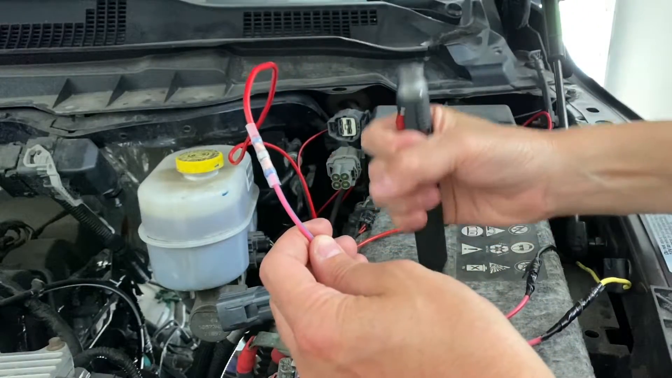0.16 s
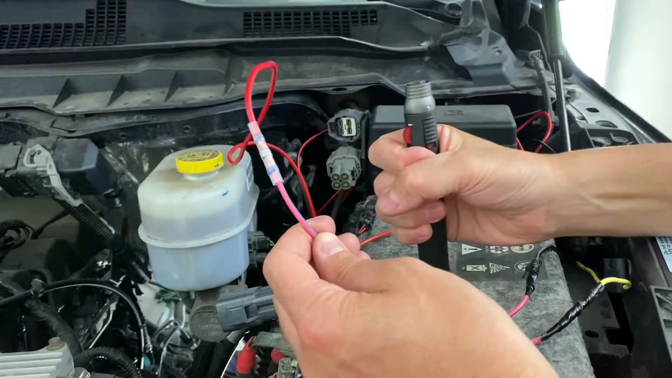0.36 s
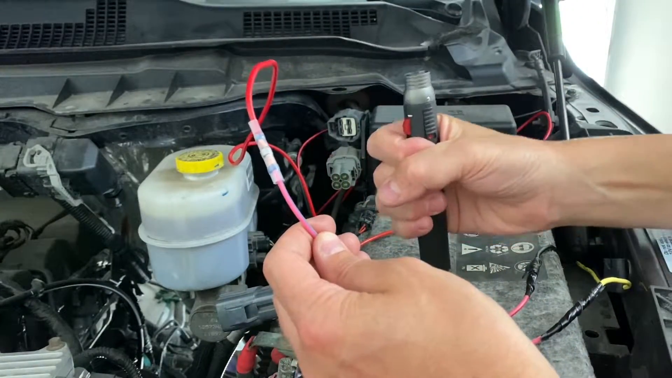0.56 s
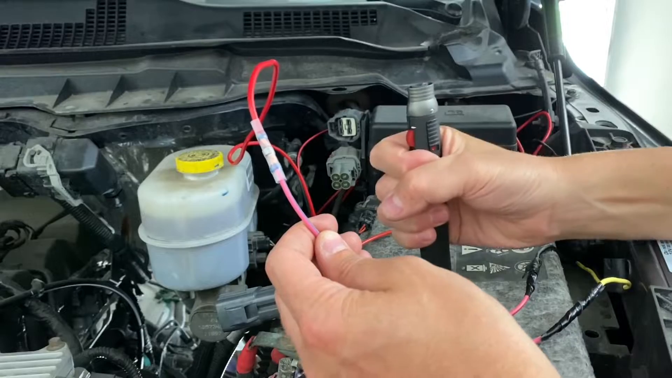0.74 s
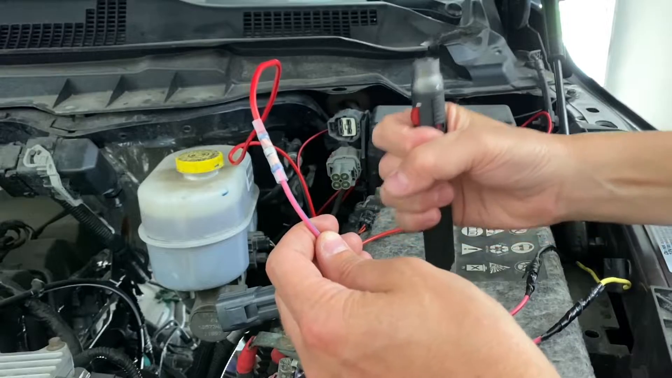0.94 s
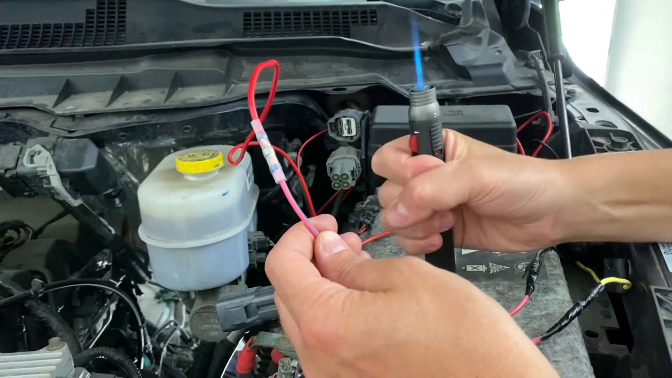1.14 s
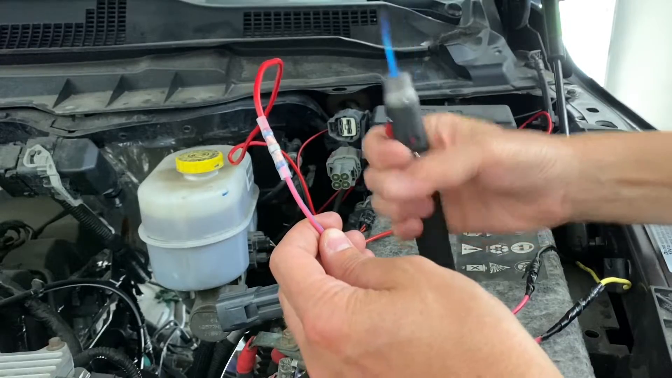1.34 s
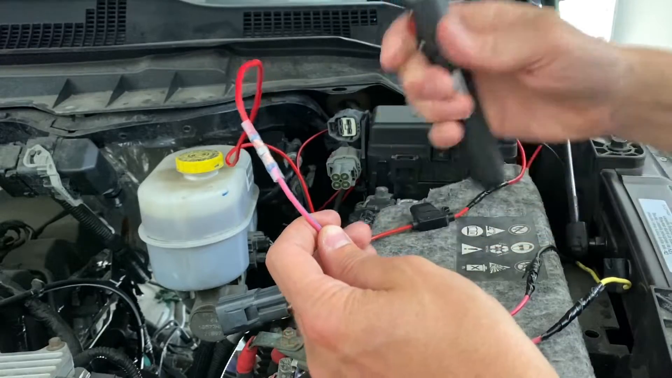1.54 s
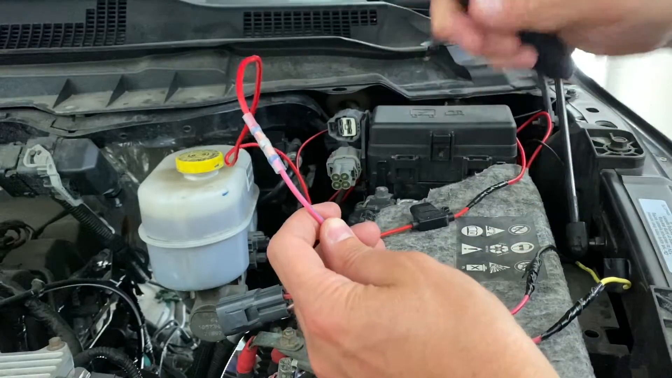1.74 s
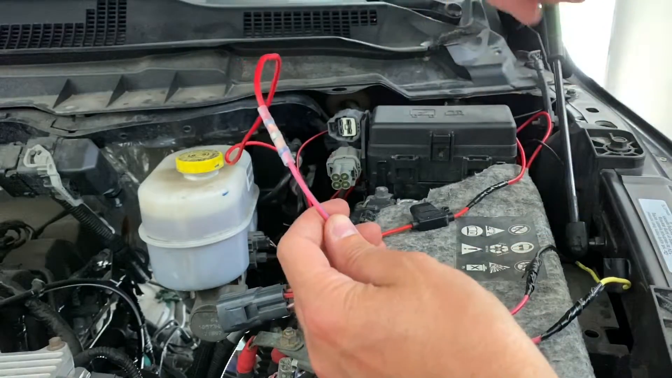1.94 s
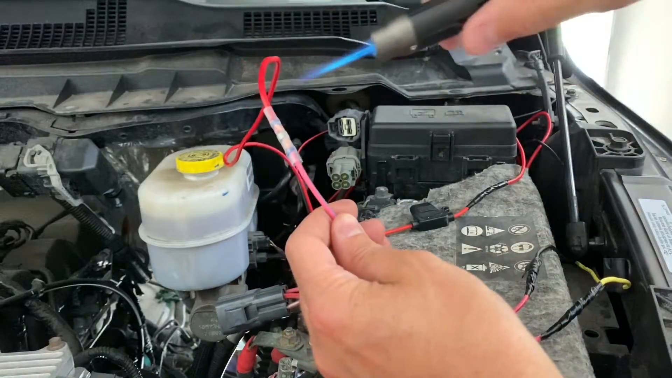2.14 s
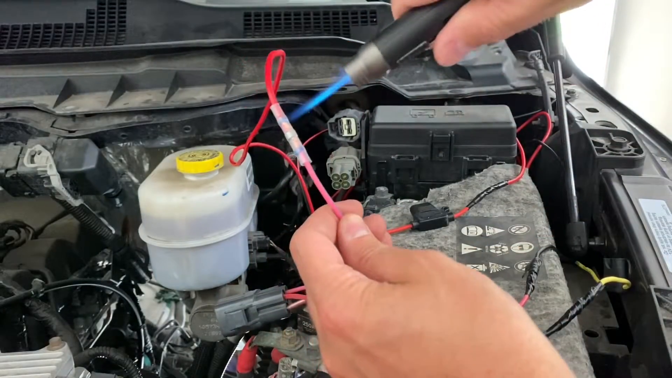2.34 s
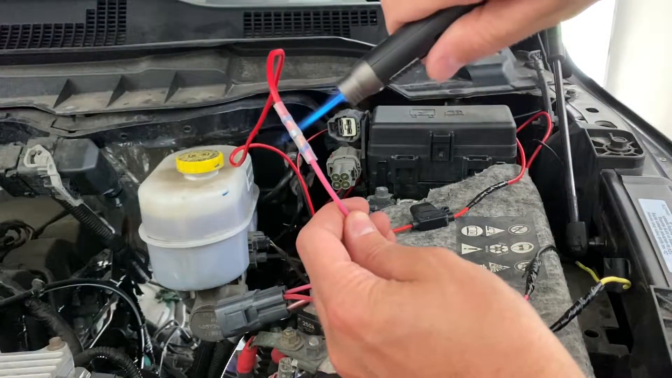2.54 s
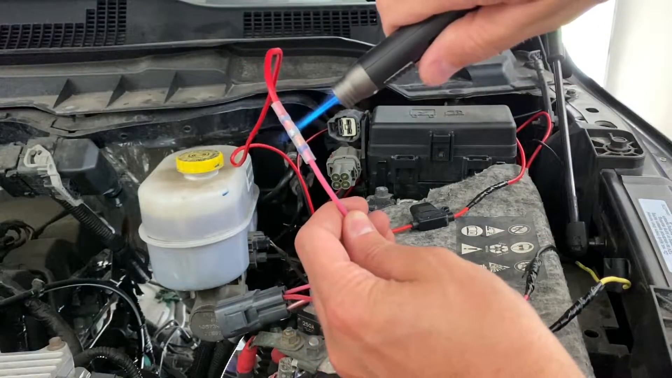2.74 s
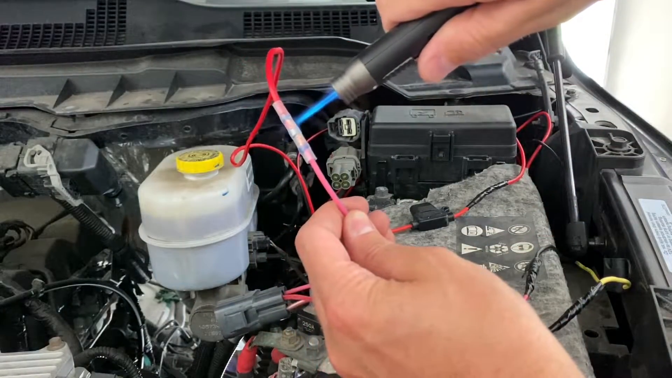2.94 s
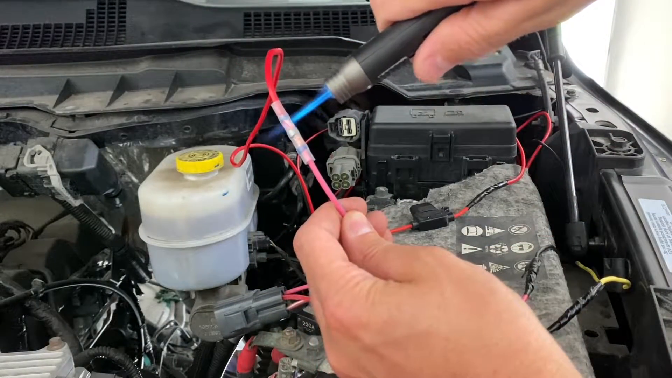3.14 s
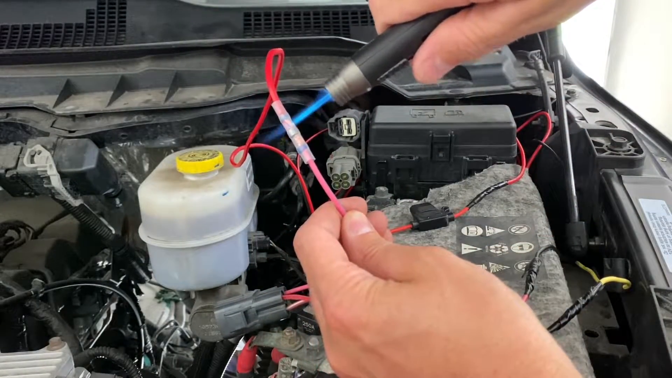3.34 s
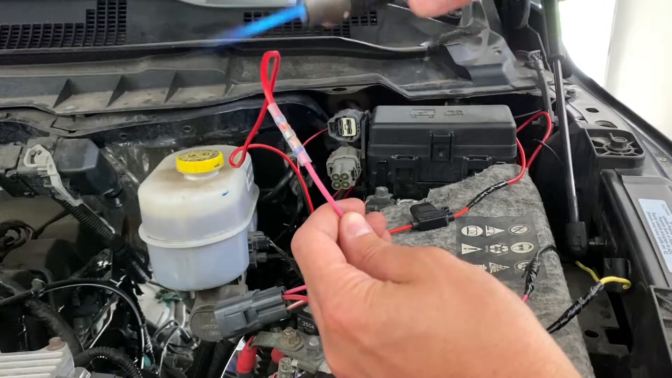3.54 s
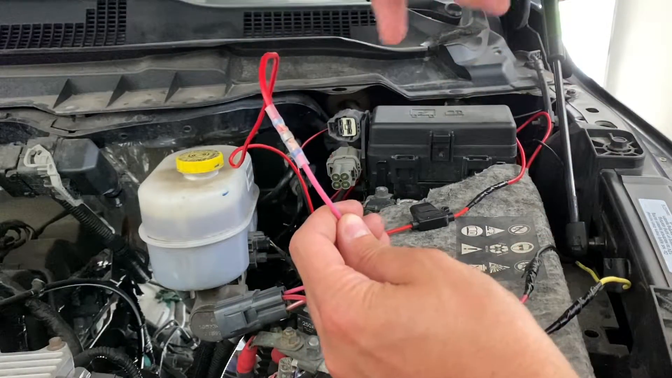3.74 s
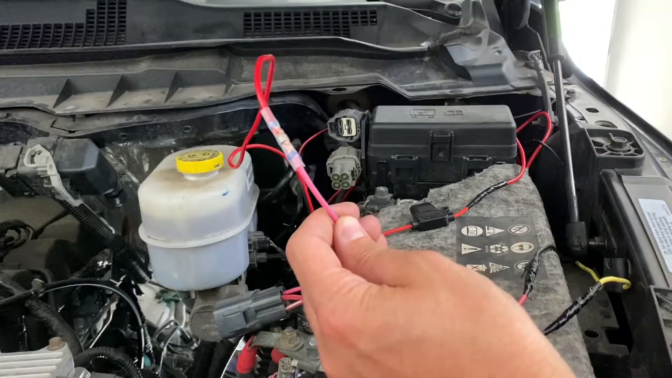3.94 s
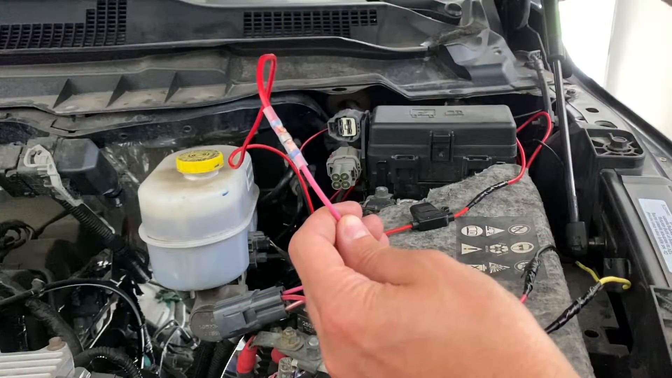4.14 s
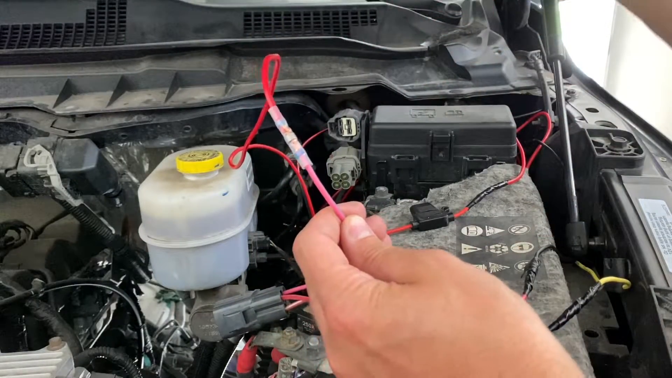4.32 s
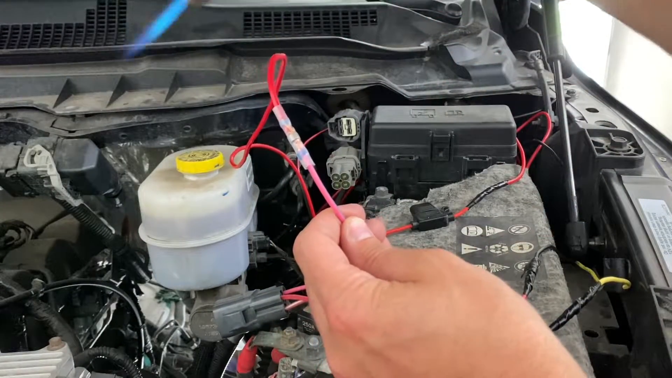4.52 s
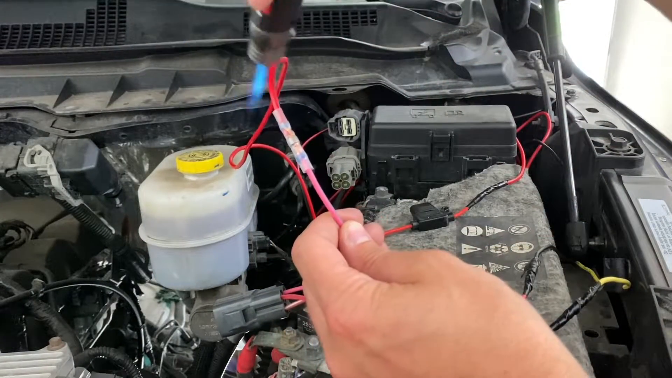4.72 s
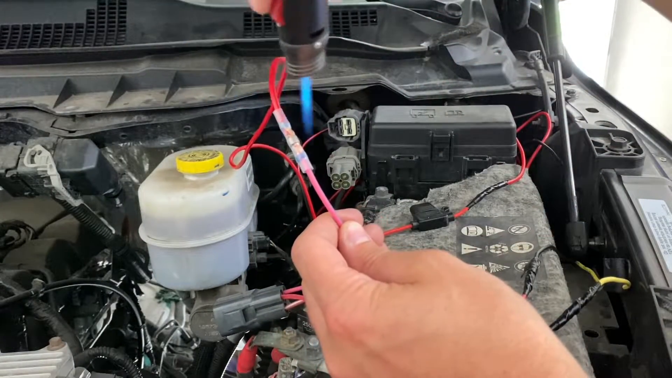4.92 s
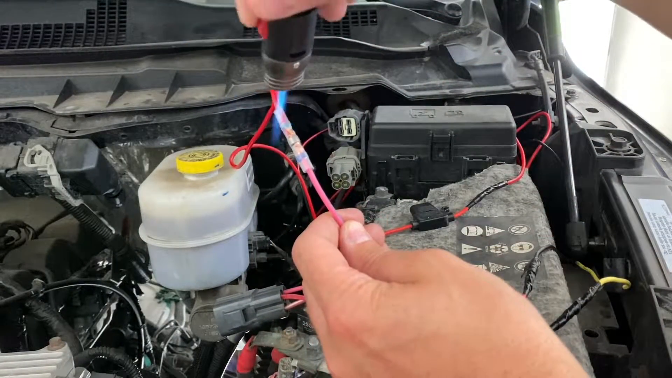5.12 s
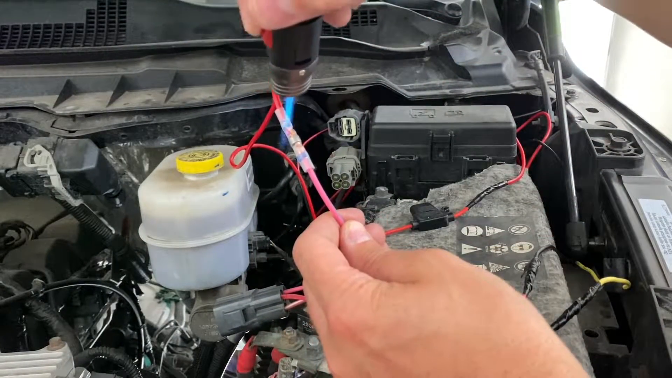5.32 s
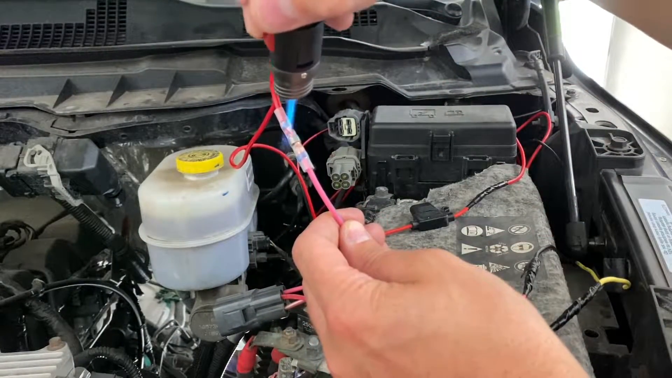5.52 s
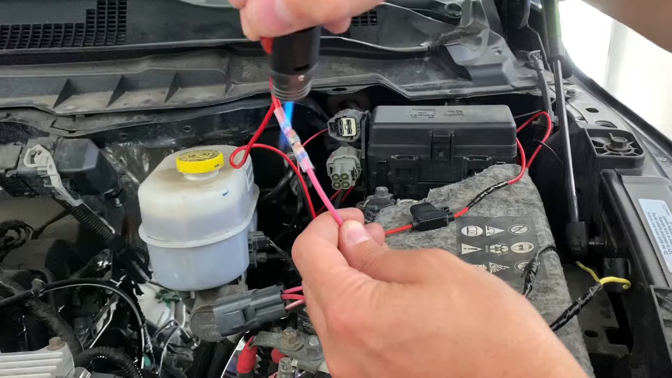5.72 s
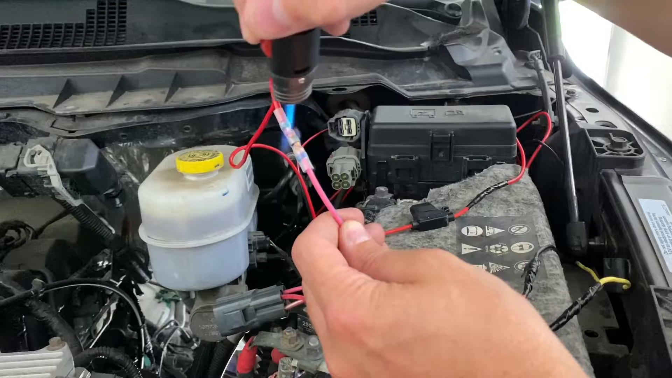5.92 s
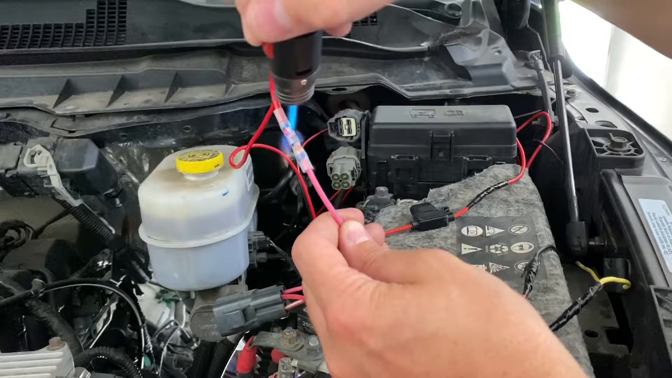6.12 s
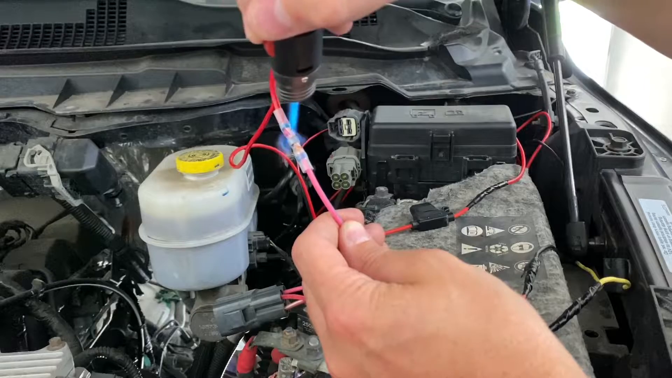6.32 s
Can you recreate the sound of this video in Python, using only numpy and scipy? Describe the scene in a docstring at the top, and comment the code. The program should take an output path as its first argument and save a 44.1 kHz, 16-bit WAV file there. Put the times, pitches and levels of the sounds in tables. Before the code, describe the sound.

A handheld torch is lit over an open engine bay, heard by a close stereo phone microphone. Plastic trigger knocks surround three loud metallic snaps in the first second. After the last, the gas catches with a low puff and burns with a high faint hiss and soft airy roar. Moving the torch makes ragged windy bursts; later a few tiny ticks. Low rumble and wandering hum lie underneath.

```python
"""A butane pencil torch in a garage, over a low rumble and a wandering hum; gas hisses throughout (shaped noise).
First the trigger clacks and the piezo igniter snaps three times (ringing body modes plus noise cracks);
a low puff of band noise follows each snap, and the garage rings briefly.
The third spark lights the gas: the hiss changes colour and a small flame roars softly (drifting noise).
It tears in crackling bursts when the torch is swung; later, thin ticks (ringing noise) come from the hand."""
import sys
import numpy as np
from scipy import signal
from scipy.fft import rfft, irfft, next_fast_len
from scipy.io import wavfile
from scipy.ndimage import uniform_filter1d, map_coordinates

SR = 44100
rng = np.random.default_rng(int(sys.argv[2]) if len(sys.argv) > 2 else 0)


def dump_mix(stems):
    """Bounce the given channels to the path in sys.argv[1] as a 16-bit WAV at rate SR."""
    frames = np.atleast_2d(stems).T  # one column per channel
    limited = np.clip(frames, -1, 1)  # hard clip at full scale
    pcm = np.round(limited * 32767).astype(np.int16)
    wavfile.write(sys.argv[1], SR, pcm)


N = 280917  # samples


def amp(db):
    """Decibels to gain."""
    return 10 ** (np.asarray(db) / 20)


def unit(x):
    """Scale to rms 1."""
    return x / np.sqrt(np.mean(x ** 2) + 1e-20)


def along(points, hz):
    """Interpolate (f/Hz, value) points on a log frequency axis."""
    f, v = np.transpose(points)
    return np.interp(np.log(hz + 1), np.log(f + 1), v)


def curves(rows):
    """One value per sample for each column after the time."""
    s, *cols = np.transpose(rows)
    return [np.interp(np.arange(N) / SR, s, c) for c in cols]


def wobble(rate_hz):
    """A smooth random curve with rate_hz knots a second."""
    knots = rng.standard_normal(int(N * rate_hz / SR) + 4)
    return map_coordinates(knots, [np.arange(N) * rate_hz / SR])


def filtered(x, response):
    """Filter x by a complex response of frequency."""
    n = x.shape[-1]
    m = next_fast_len(n + SR // 4)
    return irfft(rfft(x, m) * response(np.fft.rfftfreq(m, 1 / SR)), m)[..., :n]


def equalized(x, points):
    """Filter x by (f/Hz, gain/dB) points."""
    return filtered(x, lambda hz: amp(along(points, hz)))


def highpassed(x, cutoff_hz):
    """Fourth-order high-pass."""
    return signal.sosfilt(signal.butter(4, cutoff_hz, "high", fs=SR, output="sos"), x)


def lifted(x, resonances):
    """Lift narrow bands, given as (f/Hz, width/Hz, lift/dB)."""
    def response(f):
        return amp(sum(db / (1 + (2 * (f - hz) / width) ** 2) for hz, width, db in resonances))
    return filtered(x, response)


def glide(x, hz, db, width_hz):
    """Lift or dip one band whose centre, gain and width are given per sample."""
    f, t, z = signal.stft(x, SR, nperseg=2048)
    hz, db, width_hz = [np.interp(t * SR, np.arange(N), c) for c in (hz, db, width_hz)]
    gain = amp(db / (1 + (2 * (f[:, None] - hz) / width_hz) ** 4))
    return signal.istft(z * gain, SR, nperseg=2048)[1][:, :N]


def stereo(pair, alike):
    """Mix two unrelated signals into left and right of a given likeness."""
    def mid_side(hz):
        turn_rad = np.arccos(np.clip(along(alike, hz), -1, 1)) / 2
        return np.array([np.cos(turn_rad), np.sin(turn_rad)])
    mid, side = filtered(pair, mid_side)
    return np.array([mid + side, mid - side])


def rush(spectrum, alike, patchy_db):
    """Coloured stereo noise of rms 1, with drifting patches of stronger and weaker sound."""
    z = signal.stft(rng.standard_normal((2, N)), nperseg=512)[2]
    field = uniform_filter1d(rng.standard_normal(z.shape[1:]), size=5, axis=0)
    field = uniform_filter1d(field, size=16, axis=1)
    pair = signal.istft(z * amp(patchy_db * unit(field)), nperseg=512)[1][:, :N]
    return unit(stereo(equalized(pair, spectrum), alike))


def add(track, s, sound):
    """Mix a sound into a track at time s."""
    part = track[..., max(round(s * SR), 0):][..., :sound.shape[-1]]
    part += sound[..., :part.shape[-1]]


# hollows of the engine bay: f/Hz, width/Hz, lift/dB
BAY_RESONANCES = [(211, 14.6, 6), (357, 33, 4), (446, 40, 6.5), (674, 140, 6), (1300, 150, 4),
                  (1540, 44, 6), (1760, 35, 3), (2057, 44, 6), (2680, 160, 2.5), (3420, 100, 1.5)]


def in_engine_bay(x):
    """The hollows of the engine bay lift their own narrow bands."""
    return lifted(x, BAY_RESONANCES)


# left-right likeness of diffuse sound, nearby gas and flame, direct clicks: f/Hz, likeness/0-1
DIFFUSE_LIKENESS = [(60, 0.96), (130, 0.98), (290, 0.68), (640, 0.035), (6500, 0.11), (9000, 1),
                    (15000, 0.815)]
NEAR_LIKENESS = [(60, 0.94), (130, 0.95), (290, 0.58), (640, 0.68), (1400, 0.43), (3100, 0), (6500, 0.7),
                 (9000, 1), (15000, 0.92)]
DIRECT_LIKENESS = [(200, 0.323), (1000, 0.82), (6500, 0.57), (11000, 1)]
# garage levels before trim: t/s, rumble level/dB, hum level/dB
GARAGE_LEVELS = [(0, -55, -55.5), (1.5, -55, -52.5), (2.9, -53.5, -59), (4.0, -54.5, -47),
                 (5.0, -50.5, -46), (6.37, -47.5, -50)]
# rumble spectrum, relative: f/Hz, density/dB per Hz
RUMBLE_SPECTRUM = [(20, -56), (33, -20), (52, -2), (95, 3.5), (140, -5.5), (205, -11.5), (280, -13),
                   (500, -20.5), (1000, -24), (2000, -35), (4000, -73.5), (16000, -58)]


def background(rumble_db=2, hum_db=-3, hum_hz=61.6, wander_hz=3.46, sway_db=2.5):
    """Low garage rumble (noise) with a hum (sine) that wanders in pitch and level."""
    rumble_level_db, hum_level_db = curves(GARAGE_LEVELS)
    phase = 2 * np.pi * np.cumsum(hum_hz + wander_hz * wobble(12)) / SR
    hum = unit(amp(sway_db * wobble(11)) * np.sin(phase))
    rumble = rush(RUMBLE_SPECTRUM, DIFFUSE_LIKENESS, patchy_db=0.43)
    return amp(rumble_level_db + rumble_db) * rumble + amp(hum_level_db + hum_db) * hum


# low air puffs after the sparks: t/s, level/dB, f/Hz, swell/s
SPARK_PUFFS = [(0.273, -47, 166, 0.012), (0.629, -46, 180, 0.011), (1.059, -38.5, 98, 0.011)]


def puffs():
    """A soft low puff of band noise follows each spark; the deepest is the gas catching."""
    out, t = np.zeros(N), np.arange(SR // 5) / SR
    for s, db, hz, swell_s in SPARK_PUFFS:
        air = filtered(rng.standard_normal(len(t)), lambda f: 1 / (1 + (2 * (f - hz) / hz) ** 8))
        swell = t / swell_s * np.exp(1 - t / swell_s)
        add(out, s, amp(db) * unit(air * swell) * np.sqrt(np.mean(swell ** 2)))
    return highpassed(out, 50)


# torch ticks in the hand: t/s, level/dB, ring f/Hz
HAND_TICKS = [(3.549, -46, 2500), (3.799, -50, 3000), (3.894, -45.5, 2850), (3.918, -48, 2700),
              (4.100, -51, 2900), (4.133, -50, 4300), (4.369, -34, 1650), (4.611, -41, 4630),
              (4.757, -39, 4650), (4.987, -50, 3800), (5.001, -52, 2200), (5.09, -45, 1900),
              (6.261, -47.5, 1600)]


def tick(ring_db=11, width_hz=450, t60_s=0.046):
    """Thin, bright noise ticks as the torch is turned in the hand, each with a brief ring."""
    out, t = np.zeros((2, N)), np.arange(SR // 10) / SR
    for s, db, hz in HAND_TICKS:
        noise = amp(-60 * t / t60_s) * rng.standard_normal((2, len(t)))
        add(out, s, amp(db) * lifted(noise, [(hz, width_hz, ring_db)]))
    out = equalized(out, [(400, -8.0), (1600, -4.5), (4500, -6.5), (8000, -5.5), (15000, 2)])
    return stereo(out, DIRECT_LIKENESS)


# torch body modes: f/Hz, level/dB, t60/s before damping
BODY_MODES = [(510, -14, 0.0047), (720, -6.5, 0.0094), (988, -0.5, 0.021), (1430, -3, 0.018),
              (1707, -11.5, 0.026), (2040, -4.5, 0.0208), (2460, -3, 0.015), (2820, -6, 0.012),
              (3090, -3, 0.016), (3790, -9, 0.0122), (4113, -3.5, 0.022), (4330, -6.5, 0.031),
              (4550, -5.5, 0.018), (5240, -4.5, 0.014), (5680, -9, 0.0134), (6190, -2.5, 0.013),
              (6610, -1.5, 0.021), (6950, -3.5, 0.014), (7780, -11.5, 0.022), (9390, -12, 0.04),
              (9690, -11, 0.027), (13850, -18, 0.0345), (14950, -12, 0.016)]


def strike(treble_db, crack_db, crack_t60_s, damping, grip):
    """One contact on the torch body: modes detuned by the grip, plus a crack; soft contacts lack treble."""
    t = np.arange(SR // 10) / SR
    hz, db, t60_s = np.transpose(BODY_MODES)[:, :, None]
    hz = hz * (1 + grip * rng.standard_normal(hz.shape))
    scatter_db = rng.normal(0, 1.0, (2, len(BODY_MODES), 1))
    db = db + treble_db * along([(1000, 0.016), (3000, 0.94)], hz) + scatter_db
    phase = rng.uniform(0, 2 * np.pi, (2, len(BODY_MODES), 1))
    modes = amp(db - 60 * t * damping / t60_s) * np.sin(2 * np.pi * hz * t + phase)
    ring = np.sum(modes, axis=1)
    crack = amp(crack_db + treble_db - 60 * t / crack_t60_s) * rng.standard_normal((2, len(t)))
    contact = (ring + crack) * (1 - np.exp(-t / 0.00063))
    # so small a body radiates little bass
    return highpassed(contact, 400)


# decay of the room: f/Hz, t60/s
GARAGE_T60 = [(200, 0.28), (1000, 0.6), (4000, 0.74), (7000, 0.65), (14000, 0.67)]
# colour of the reflections: f/Hz, gain/dB
GARAGE_TONE = [(100, -9), (400, -1), (900, 3.5), (2000, 3), (2600, 4), (3500, 4.5), (4350, 2.5),
               (5400, 5.5), (6700, 2.5), (9000, 2.5), (14000, -4.5)]
# resonances that linger after a click: f/Hz, width/Hz, lift/dB
LINGERING = [(1710, 124, 6.5), (3130, 90, -1.5), (4130, 158, 4), (4370, 220, 4), (5920, 200, 4)]


def in_garage(hit, early_db, late_db, early_t60_s):
    """A hit with quick reflections from engine bay and bonnet, then the room tail, as decaying noise."""
    hz, t, z = signal.stft(rng.standard_normal((2, SR * 3 // 4)), SR, nperseg=256)
    late = signal.istft(z * amp(-60 * t / along(GARAGE_T60, hz)[:, None]), SR, nperseg=256)[1]
    early_decay = amp(-60 * np.arange(late.shape[1]) / SR / early_t60_s)
    early = rng.standard_normal(late.shape) * early_decay
    answer = amp(late_db) * late / np.linalg.norm(late[0])
    answer = answer + amp(early_db) * early / np.linalg.norm(early[0])
    # the walls gather sound from all directions, which evens out the body's resonances
    power = np.mean(np.abs(rfft(hit, SR)) ** 2, axis=0)
    colour = np.sqrt(np.abs(uniform_filter1d(power, size=900)))
    answer = filtered(answer, lambda f: np.interp(f, np.arange(len(colour)), colour))
    answer = lifted(equalized(answer, GARAGE_TONE), LINGERING)
    delay = round(0.0055 * SR)
    out = np.pad(stereo(answer, DIFFUSE_LIKENESS), ((0, 0), (delay, 0)))
    add(out, 0, hit)
    return out


# trigger and catch contacts: t/s, level/dB before trim, treble/dB before hardness
TRIGGER_CLACKS = [(0.018, -22.5, -7.5), (0.1864, -19, -20), (0.472, -35.5, -30), (0.537, -26.5, -3),
                  (0.547, -25.5, -35), (0.5877, -21, -27.5), (0.593, -26, -12.5), (0.834, -35, -26),
                  (0.8901, -23.5, -8), (0.898, -22.5, -30), (1.036, -16, -19.5), (1.323, -25, -5),
                  (1.3308, -20.5, -22.5)]


def trigger(clack_db=-5.0, hardness_db=4):
    """The plastic trigger knocks on its stops, damped and shielded by the hand."""
    out = np.zeros((2, N))
    for s, db, treble_db in TRIGGER_CLACKS:
        knock = strike(treble_db + hardness_db, crack_db=4.0, crack_t60_s=0.026, damping=1.04, grip=0.034)
        heard = in_garage(stereo(knock, DIRECT_LIKENESS), early_db=-13, late_db=-17, early_t60_s=0.08)
        add(out, s, amp(db + clack_db) * heard)
    return equalized(out, [(500, 10.0), (1000, -0.5), (4500, 0.0), (7000, -9.5), (15000, -11.0)])


# piezo hammer blows: t/s, level/dB before trim, treble/dB, rebound delay/s
HAMMER_BLOWS = [(0.2632, -15.5, 2, 0.0025), (0.615, -13, -0.5, 0.0017), (1.0515, -11.5, 0, .0025)]


def igniter(rebound_db=-2, snap_db=-3.0, grip=0.007):
    """The spring hammer hits the piezo crystal and rebounds once; the grip detunes each strike."""
    out = np.zeros((2, N))
    for s, db, treble_db, rebound_s in HAMMER_BLOWS:
        snap = strike(treble_db, crack_db=5.0, crack_t60_s=0.013, damping=1.59, grip=grip)
        rebound = strike(treble_db + 2.5, crack_db=-1.5, crack_t60_s=0.012, damping=1.47, grip=grip)
        add(snap, rebound_s, amp(rebound_db) * rebound)
        direct = stereo(snap, DIRECT_LIKENESS)
        heard = in_garage(direct, early_db=-15.0, late_db=-16.5, early_t60_s=0.12)
        add(out, s, amp(db + snap_db) * heard)
    return out


def alight(light_s=1.06, rise_s=0.018):
    """0 before the gas catches, then a quick rise to 1."""
    return np.clip((np.arange(N) / SR - light_s) / rise_s, 0, 1)


# where the torch is held, twice raised and twice lowered to the work: t/s, distance from engine cover/m
TORCH_HEIGHT = [(1.25, 0.3), (1.55, 0.4), (2.03, 0.39), (2.3, 0.19), (3.36, 0.18), (3.58, 0.36),
                (4.55, 0.34), (5.15, 0.21), (5.7, 0.19)]


def held_m():
    """Distance of the torch from the engine cover."""
    return curves(TORCH_HEIGHT)[0]


def raised(work_m=0.17):
    """Metres by which the torch is held above its working position."""
    return held_m() - work_m


# gas spectra, relative (unlit, burning, lower band of the burning hiss): f/Hz, density/dB per Hz
COLD_SPECTRUM = [(300, -28.5), (2000, -7.5), (3500, -15), (4300, -10.5), (5500, -13), (8000, -15.5),
                 (10300, -12), (11600, -10), (12900, 2.5), (14500, -5), (15800, -17.5)]
HOT_SPECTRUM = [(300, -54), (7000, -33), (10500, -20), (12000, 2), (13000, 4), (14000, 6), (15800, -4.5)]
SKIRT_SPECTRUM = [(300, -42), (4000, -14), (7500, -25.5), (9000, -8.5), (10500, 1.5), (11600, 3.5),
                  (13000, -6.5), (15800, -19.5)]
# dark band sliding through the hiss as the nozzle turns: t/s, f/Hz, gain/dB
NOZZLE_BAND = [(2.15, 12300, 3), (2.28, 13100, -9), (2.36, 14300, -9), (2.48, 15200, -1), (2.56, 12950, -7),
               (3.35, 12900, -1.5), (3.55, 12900, 0), (4.2, 13000, -3), (4.3, 13800, -6), (4.42, 14600, 0)]
# hiss before trims: t/s, level/dB
HISS_LEVEL = [(0, -58), (1.0, -59), (1.15, -56), (1.5, -56), (1.87, -52), (2.35, -52.5), (3.3, -55),
              (3.67, -52.3), (4.2, -55), (4.98, -54), (5.08, -54.5), (5.75, -53.2), (6.37, -53.8)]


def gas(cold_db=3, hot_db=1.5, skirt_db=-5.5, skirt_db_per_m=12.5, waver_db=0.5, dip_width_hz=1100):
    """The jet hisses from the nozzle throughout, broader once it burns and when it is raised."""
    def jet(spectrum):
        return rush(spectrum, NEAR_LIKENESS, patchy_db=1.3)
    lit = alight()
    cold = amp(cold_db) * jet(COLD_SPECTRUM)
    top = amp(hot_db) * jet(HOT_SPECTRUM)
    skirt = amp(skirt_db + skirt_db_per_m * raised()) * jet(SKIRT_SPECTRUM)
    hot = glide(top + skirt, *curves(NOZZLE_BAND), np.full(N, dip_width_hz))
    level = amp(curves(HISS_LEVEL)[0] + waver_db * wobble(28))
    return level * ((1 - lit) * cold + lit * hot)


# torn flame spectrum, relative: f/Hz, density/dB per Hz
TORN_SPECTRUM = [(60, -25), (250, -7), (400, -1), (620, 2), (820, -2.5), (1100, -1), (1550, -6),
                 (2100, -4.5), (3000, -10), (4400, -12), (6000, -16), (8000, -17), (11000, -17),
                 (16000, -41.5)]


def ragged(crackle, pops_per_s=700):
    """Noise of a torn flame: fluttering, with pockets of gas burning off as tiny pops."""
    pops = (rng.random(N) < pops_per_s / SR) * rng.standard_normal(N)
    pops = unit(equalized(pops, TORN_SPECTRUM))
    flutter = amp(1.7 * wobble(260))
    return unit(flutter * rush(TORN_SPECTRUM, NEAR_LIKENESS, patchy_db=3) + crackle * pops)


def turbulence(base_db=-74.5, db_per_m=52.5, unrest_db=2.0, flickers_per_s_per_m=35, flicker_db=-27):
    """Strength of the flame's turbulence: more restless when raised, with chance flickers."""
    height_m = raised()
    starts = rng.random(N) < flickers_per_s_per_m * height_m / SR
    flicker_s = 0.007
    flickers = signal.fftconvolve(starts.astype(float), np.hanning(round(flicker_s * SR)), "same")
    strength = amp(base_db + db_per_m * height_m + unrest_db * wobble(30))
    return strength * (1 + amp(flicker_db) * flickers)


# tears in moving air: t/s, length/s, level/dB before trim, build-up/s, treble/dB, resonance f/Hz, lift/dB
FLAME_TEARS = [(1.563, 0.046, -52, 0.017, -0.5, 1350, 6), (1.758, 0.069, -50.5, 0.016, -2, 1200, 3),
               (1.893, 0.062, -48, 0.014, -3, 1750, 2), (1.988, .05, -63.5, .015, 0, 1100, 10),
               (2.947, 0.034, -61, 0.012, -2, 1500, 13.5), (2.983, 0.044, -51.5, 0.03, -2, 1530, 10.5),
               (3.045, 0.037, -60, .01, -8, 2700, 15), (3.086, 0.032, -56, 0.012, -7, 2730, 7),
               (3.447, 0.042, -59.5, 0.018, -2.5, 1350, 8), (3.662, 0.026, -56, 0.012, -1, 2800, 5),
               (4.015, 0.046, -59.5, 0.017, 0, 3480, 3), (4.188, 0.055, -56.5, 0.027, 1, 700, 10),
               (4.391, 0.044, -49.5, .012, 1, 2040, 5.5), (4.437, 0.028, -50.5, 0.008, -0.5, 3500, 10),
               (4.47, 0.034, -51, 0.027, 2.5, 380, 8), (4.54, 0.074, -53.5, 0.04, -0.5, 1400, -2),
               (4.694, 0.077, -54.5, 0.031, -2.5, 1100, -1), (4.889, .03, -72, .016, 9, 4500, 10)]


def tears(noise, flutter_db=0.7, release_s=0.014, width_hz=220):
    """Each burst builds up, holds, then dies away, with its own brightness and resonance."""
    out, t = np.zeros((2, N)), np.arange(SR // 5) / SR
    noise = noise * amp(flutter_db * wobble(70))
    for s, length_s, db, build_s, treble_db, hz, lift_db in FLAME_TEARS:
        gate = np.clip(t / build_s, 0, 1) * np.exp(-np.maximum(t - length_s, 0) / release_s)
        burst = gate * noise[:, round(s * SR):][:, :len(t)]
        burst = equalized(burst, [(1200, 0), (4000, treble_db)])
        add(out, s, amp(db) * lifted(burst, [(hz, width_hz, lift_db)]))
    return out


# mirroring surfaces, the flame's far side radiating in opposite phase: extra path/m per m held, gain
MIRROR_SURFACES = [(2.2, -0.11), (4.4, 0.059)]


def mirrored(x, spread=0.01):
    """Nearby surfaces return the flame; the comb of their echoes slides as the torch moves."""
    n = np.arange(N)
    lag = (held_m() + 0.002 * wobble(3)) / 343 * SR  # samples per unit of path, sound at 343 m/s

    def hear(v, side):
        return v + sum(gain * np.interp(n - lag * path * side, n, v) for path, gain in MIRROR_SURFACES)
    return np.array([hear(x[0], 1 - spread), hear(x[1], 1 + spread)])


# resonance of the gap between torch and bonnet: t/s, f/Hz, lift/dB
GAP_RESONANCE = [(1.25, 1130, 2.5), (1.6, 1130, 8.5), (1.85, 1080, 9), (2.1, 1010, 4.5), (2.4, 954, 2.5),
                 (3.4, 954, 6.5), (3.65, 935, 8.5), (3.9, 1030, 5), (4.25, 1110, 8), (4.47, 1060, 4),
                 (4.6, 940, 6.5), (5.9, 950, 8)]


def in_gap(x, width_hz=76, width_hz_per_m=580):
    """One resonance glides through the flame as the torch moves, broader when raised."""
    return glide(x, *curves(GAP_RESONANCE), width_hz + width_hz_per_m * raised())


# flame roar before trim: t/s, level/dB
ROAR_CURVE = [(1.1, -50), (1.6, -59), (2.0, -51), (2.5, -51.5), (3.9, -55.5), (4.6, -52), (5.8, -54),
              (6.37, -59)]
# roar spectrum, relative: f/Hz, density/dB per Hz
ROAR_SPECTRUM = [(40, -6.5), (120, -4.5), (450, 1.5), (750, -0.5), (950, 2), (1300, -2), (1560, -5),
                 (1720, -6), (2100, -12), (2650, -10), (3500, -56), (8000, -42)]
# lean of the tears, plus on the left and minus on the right: f/Hz, gain/dB
TEAR_BALANCE = [(200, -4), (700, 3), (2400, 2.1), (8000, 0.3)]
# the flame burns to the left: f/Hz, lead of the left side/rad
LEFT_LEAD = [(120, 0.05), (400, 0.72), (1500, 0.4), (4000, 0.02), (8000, 0)]


def torch(roar_db=-4, sway_db=0.6, flicker_db=0.5, restless_db=7.5, torn_db=8.0, left_db=1.43):
    """The flame roars softly in the engine bay and tears in quick crackling bursts."""
    sides = np.array([[1], [-1]])
    roar_level_db = curves(ROAR_CURVE)[0] + roar_db + sway_db * wobble(7) + flicker_db * wobble(35)
    roar = amp(roar_level_db) * rush(ROAR_SPECTRUM, NEAR_LIKENESS, patchy_db=1.33)
    restless = amp(restless_db) * turbulence() * ragged(crackle=0.42)
    steady = in_engine_bay(roar + restless) * amp(left_db * sides)
    bursts = amp(torn_db) * tears(ragged(crackle=0.46))
    bursts = filtered(bursts, lambda hz: amp(along(TEAR_BALANCE, hz) * sides))
    flame = mirrored(steady + bursts)
    flame = filtered(flame, lambda hz: np.exp(0.5j * along(LEFT_LEAD, hz) * sides))
    return alight() * in_gap(flame)


def scene(left_db=0.5):
    """The background heard in the engine bay, the clicks, puffs, gas and flame."""
    clicks = (igniter() + trigger() + tick()) * amp([[left_db], [-left_db]])
    return in_engine_bay(background()) + puffs() + clicks + gas() + torch()


def record(dry, top=1.0, top_hz=15900):
    """The phone rounds off tall peaks, turns its channels apart in treble phase and limits the band."""
    held = dry / (1 + np.abs(dry / top) ** 4) ** (1 / 4)

    def response(hz):
        turn_rad = np.pi * np.maximum(hz - 6500, 0) / 3750
        return np.exp(1j * np.array([-turn_rad, turn_rad])) / np.sqrt(1 + (hz / top_hz) ** 200)
    return filtered(held, response)


dry = scene()
out = record(dry)
dump_mix(out)
```